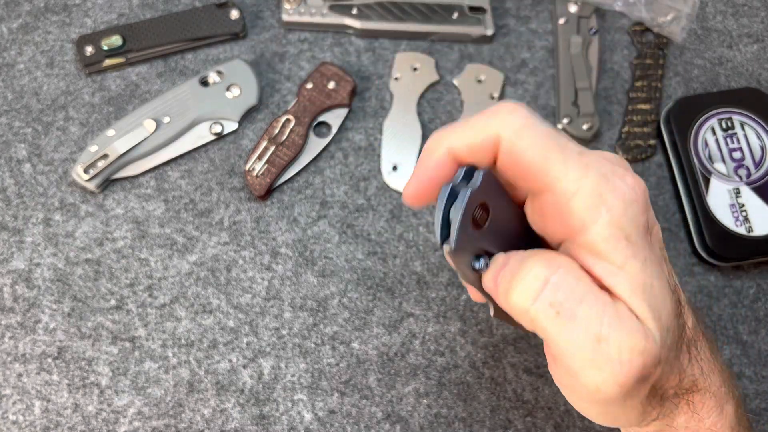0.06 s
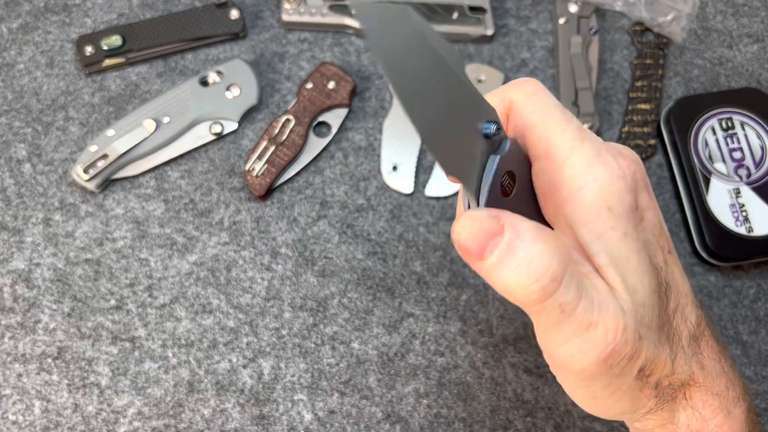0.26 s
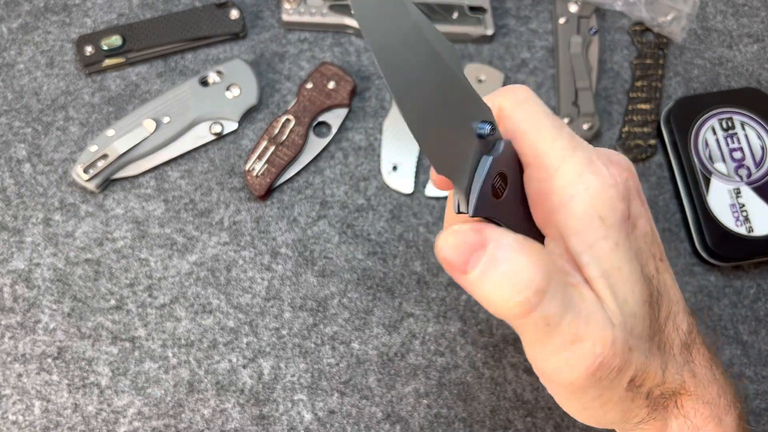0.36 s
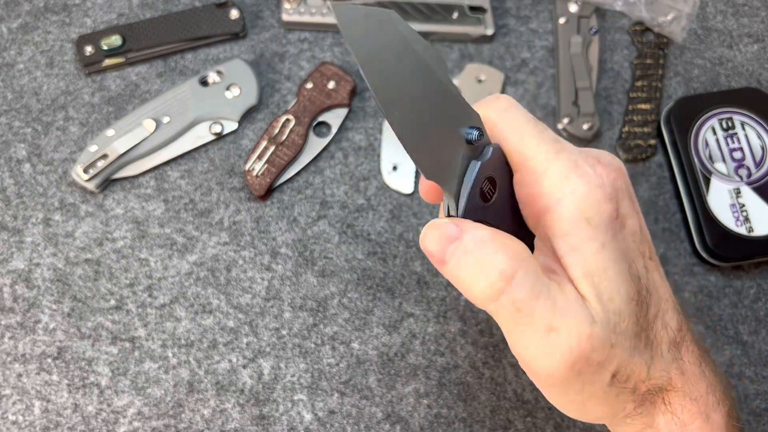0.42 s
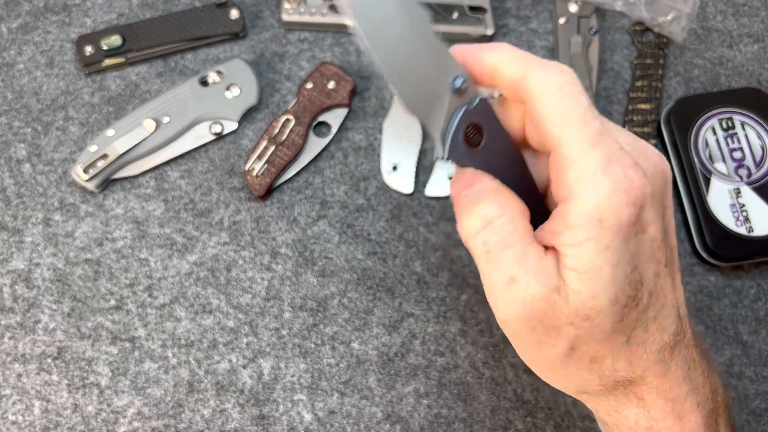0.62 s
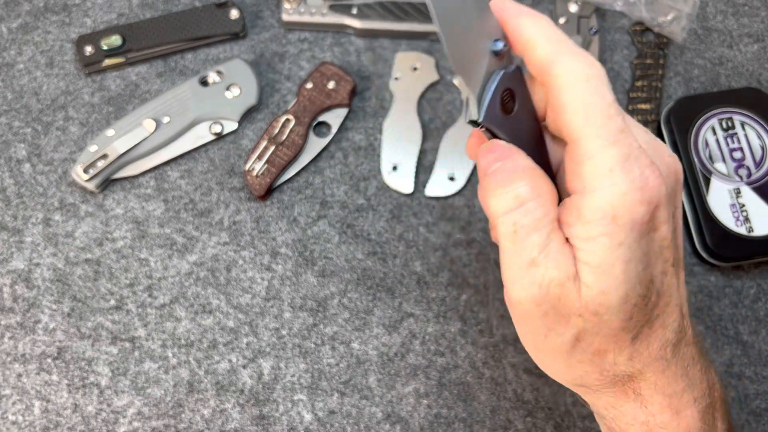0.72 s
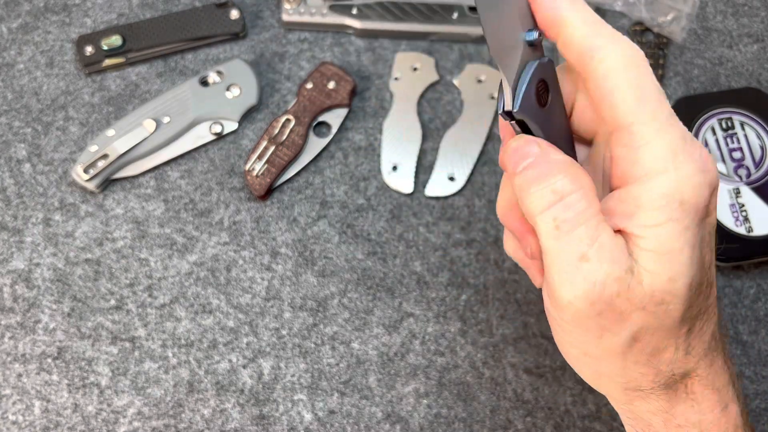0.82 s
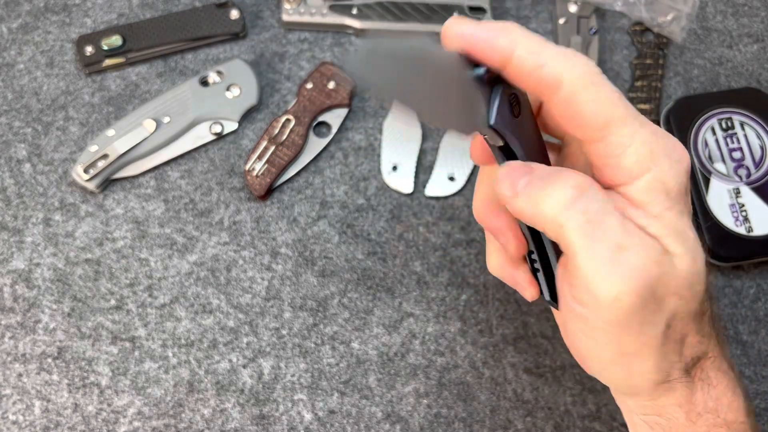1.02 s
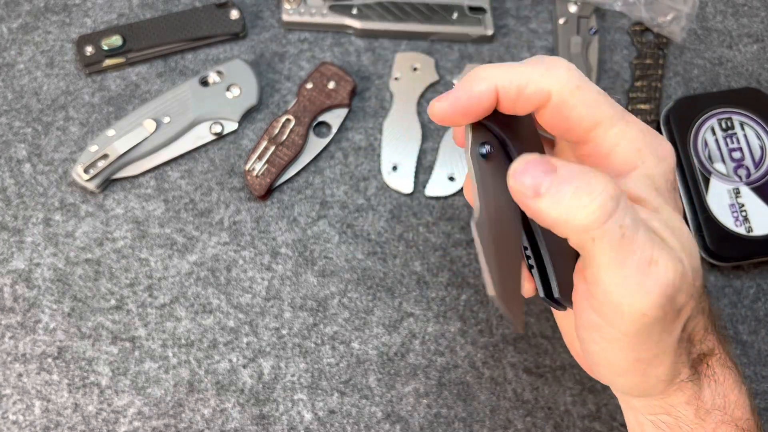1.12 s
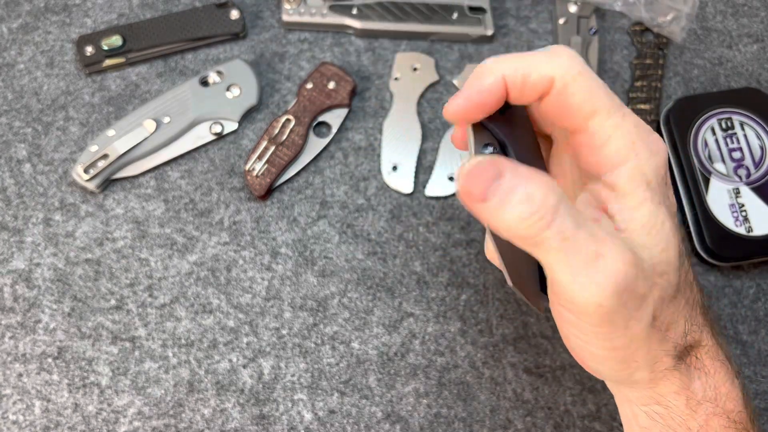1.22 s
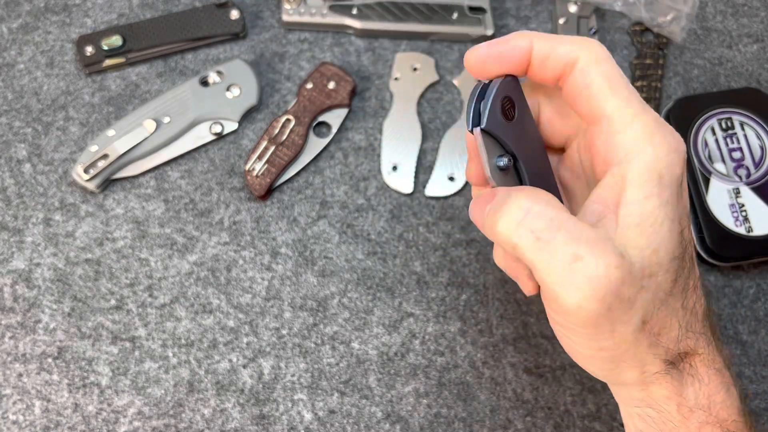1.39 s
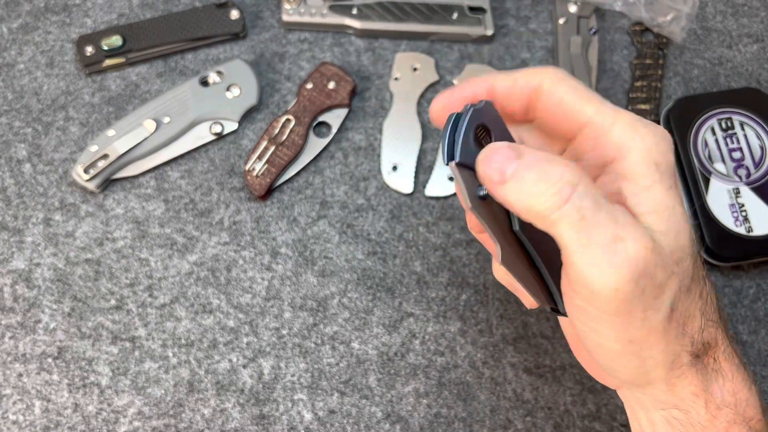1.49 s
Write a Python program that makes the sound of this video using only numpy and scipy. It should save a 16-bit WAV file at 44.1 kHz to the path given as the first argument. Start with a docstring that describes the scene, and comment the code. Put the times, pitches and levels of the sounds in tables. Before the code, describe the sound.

A folding knife handled close to a small microphone in a quiet room with low rumble and faint hiss. Tiny ticks and a brief steely scrape at 0.16 seconds lead into a very loud, clipped, clattering lock-up crack at 0.21, with short room echo. A soft thud follows at 0.6, a sharp lock click at 0.85, small ticks and faint blade rubbing from 0.94, then a crisp closing snap at 1.29.

```python
"""A low rumble and faint hiss in a quiet room, then a folding knife close to a small microphone.
The blade swings out and slams into its lock, overloading the input; something thuds softly;
the lock bar is pushed aside, the blade slides back and snaps shut.
Each blow is a short crack of noise plus the ringing modes of the steel, thrown back by table and walls.
Moving steel is dense random grit, partly ringing at a few pitches."""
import sys
import numpy as np
from scipy import signal
from scipy.fft import rfft, irfft
from scipy.io import wavfile
from scipy.ndimage import uniform_filter1d

SR = 44100
rng = np.random.default_rng(int(sys.argv[2]) if len(sys.argv) > 2 else 0)


def wrap_up_sound(samples):
    """Save the sound to the file named by the first command line argument, as 16-bit audio."""
    columns = np.atleast_2d(samples).T
    # keep every value between -1 and 1, then stretch to whole-number steps
    tamed = np.clip(columns, -1, 1)
    steps = np.round(tamed * 32767).astype(np.int16)
    wavfile.write(sys.argv[1], SR, steps)


def makeup_ratio(level_db):
    """Linear amplitude ratio for a level in decibels (20 dB per factor of ten)."""
    decades = np.asarray(level_db, float) / 20
    return 10 ** decades


N = 68355  # length in samples


def evened(x):
    """Scales a sound to rms 1."""
    return x / np.sqrt(np.mean(x ** 2) + 1e-20)


def read(points, hz):
    """Reads a curve between its points, along a logarithmic frequency axis."""
    f, value = np.transpose(points)
    return np.interp(np.log(hz + 1), np.log(f + 1), value)


def add(mix, start_s, sound):
    """Adds a sound to the mix from its start time, cut off at the end of the mix."""
    part = mix[round(start_s * SR):][:len(sound)]
    part += sound[:len(part)]


def coloured(x, spectrum):
    """Filters a sound by a spectrum curve and scales it to rms 1."""
    gain = makeup_ratio(read(spectrum, np.fft.rfftfreq(len(x), 1 / SR)))
    return evened(irfft(rfft(x) * gain, len(x)))


def resonate(x, hz, width_hz):
    """A resonance of gain 1: shifts its pitch down to zero, smooths, and shifts back up."""
    turn = np.exp(2j * np.pi * hz * np.arange(len(x)) / SR)
    r = np.exp(-np.pi * width_hz / SR)
    return 2 * (turn * signal.lfilter([1 - r], [1, -r], x / turn)).real


def resonate_twice(x, hz, width_hz):
    """Two equal resonances in a row, for steeper sides."""
    return resonate(resonate(x, hz, width_hz), hz, width_hz)


# Colour of the rumble and hiss, before scaling to one overall level: (frequency [Hz], level [dB per Hz])
FLOOR_COLOUR = [(12, -12), (25, -4.5), (45, -3), (81, -10), (132, -12), (204, -18.5), (325, -23.5),
                (461, -29), (672, -36), (850, -38), (2270, -44), (6100, -46.5), (8640, -47), (15400, -49.5)]


def floor():
    """Low rumble and faint hiss: steady random noise whose colour drifts in soft patches."""
    level_db, patchy_db = -47.5, 1.5  # overall rms, rms of the patches
    frames, hz = N // 1024 + 5, np.fft.rfftfreq(4096, 1 / SR)
    real, imaginary, patches = rng.standard_normal((frames, 2049, 3)).T
    patches = uniform_filter1d(patches, size=20, axis=0)  # across frequency
    patches = evened(uniform_filter1d(patches, size=3, axis=1))  # across time
    gain = makeup_ratio(read(FLOOR_COLOUR, hz)[:, None] + patchy_db * patches)
    noise = signal.istft((real + 1j * imaginary) * gain, nperseg=4096, noverlap=3072)[1][:N]
    return makeup_ratio(level_db) * evened(noise)


# Wavering low hum: (frequency [Hz], level [dB], width of each resonance [Hz])
HUM_BANDS = [(28.1, -47, 4.4), (91, -56, 12)]


def hum():
    """Narrow low noise, like distant machinery; the narrow bands make it waver."""
    out = np.zeros(N)
    for hz, db, width_hz in HUM_BANDS:
        noise = resonate_twice(rng.standard_normal(2 * N), hz, width_hz)
        out += makeup_ratio(db) * evened(noise[N:])  # the first half lets the resonance settle
    return out


# Small ticks of detent and fingers:
# (time [s], level [dB], centre [Hz], width of each resonance [Hz], fall by 60 dB [s])
SMALL_TICKS = [(.1613, -32.5, 3300, 3000, .012), (.1800, -24, 1300, 1500, .008),
               (.9365, -43, 1450, 2440, .025), (.937, -54, 770, 245, 0.07), (.9385, -44.5, 5960, 1500, .02),
               (.9585, -33, 7150, 5870, .01), (.9585, -38.5, 1590, 1990, .012),
               (.12, -57, 3100, 502, 0.033)]


def ticks():
    """Tiny dying bursts of noise, each around one pitch."""
    out, t = np.zeros(N), np.arange(2048) / SR
    for start_s, db, hz, width_hz, t60 in SMALL_TICKS:
        burst = evened(resonate_twice(rng.standard_normal(len(t)), hz, width_hz))
        soft_start = np.minimum(t / 0.0012, 1)
        add(out, start_s, makeup_ratio(db - 60 * t / t60) * soft_start * burst)
    return out


# How long each band lingers in the room: (frequency [Hz], fall by 60 dB [s])
ROOM_DECAY = [(250, 0.062), (700, 0.43), (1800, 0.26), (4600, .21), (9000, .19), (15000, .16)]
# First reflections off table and walls: (delay [s], level [dB])
EARLY_ECHOES = [(.0012, -13.5), (.0046, -18.5), (.0083, -18.5)]


def room(x):
    """A few early echoes, then sparse taps whose bands die at their own speed."""
    tail_db = -14
    taps = np.zeros(SR // 2)
    slots = np.arange(200, SR // 2 - 12, 12)
    taps[slots + rng.integers(0, 12, len(slots))] = rng.choice([-1., 1.], len(slots))
    hz, t, z = signal.stft(taps, SR, nperseg=256)
    fade = makeup_ratio(-60 * t / read(ROOM_DECAY, hz)[:, None])
    tail = signal.istft(z * fade, SR, nperseg=256)[1]
    response = makeup_ratio(tail_db) * tail / np.linalg.norm(tail)
    for k, (delay_s, db) in enumerate(EARLY_ECHOES):
        add(response, delay_s, (-1) ** k * makeup_ratio([db]))  # signs alternate
    return signal.fftconvolve(x, response)[:N]


def rub(path, spectrum, lines, sing_db):
    """Dense grit under moving steel, partly ringing it; sing_db sets the ringing against the grit."""
    grit_per_s, grit_db = 12000, 1.5  # average count of grains, average lift of a grain
    t, (time_s, db) = np.arange(N) / SR, np.transpose(path)
    hits = rng.random(N) < grit_per_s / SR
    grit = makeup_ratio(grit_db * rng.exponential(1, N)) * hits * rng.choice([-1, 1], N)
    sing = sum(makeup_ratio(g) / np.sqrt(width_hz) * resonate(grit, hz, width_hz) for hz, width_hz, g in lines)
    sound = evened(coloured(grit, spectrum) + makeup_ratio(sing_db) * evened(sing))
    return sound * makeup_ratio(np.interp(t, time_s, db, left=-140, right=-140))


# Loudness of the blade rubbing round its pivot on the way out: (time [s], level [dB])
SWING_OUT_LEVEL = [(.161, -66.5), (.167, -47.5), (.172, -40.5), (.185, -32.5), (.196, -39), (.201, -42.5),
                   (.209, -40.5)]
# Colour of the rub, before scaling: (frequency [Hz], level [dB per Hz])
RUB_COLOUR = [(880, -49), (1500, -17.5), (3120, -7.5), (4300, -11), (7870, -3), (8430, -3), (9110, -0.5),
              (10200, -18.5), (11500, -7), (15400, -15.5)]
# Steel singing under the rub, before scaling: (frequency [Hz], width [Hz], level [dB])
STEEL_LINES = [(7640, 250, -4), (8340, 110, -4), (9235, 230, -6), (11400, 200, -8.5), (12100, 250, 1.5)]


def swing_out():
    """The opening blade rubs round its pivot, and the grit makes the steel sing."""
    return rub(SWING_OUT_LEVEL, RUB_COLOUR, STEEL_LINES, sing_db=-5)


def click(spectrum):
    """A click of the given colour and energy 1 that starts at once (minimum phase)."""
    log_gain = np.log(makeup_ratio(read(spectrum, abs(np.fft.fftfreq(4096, 1 / SR)))))
    pulse = np.fft.ifft(np.exp(np.conj(signal.hilbert(log_gain)))).real[:2048]
    return pulse / np.linalg.norm(pulse)


def crack_noise(t, colour, tilt_db, t60):
    """A dying burst of noise, its spectrum evened out and then coloured."""
    fade = makeup_ratio(-60 * t / t60)
    burst = rfft(rng.standard_normal(len(t)) * fade)
    burst = irfft(burst / np.sqrt(uniform_filter1d(abs(burst) ** 2, size=90)))
    burst *= np.minimum(t / 0.00082, 1) * (t < t60 * 2)
    tilted = [(hz, db + tilt_db * np.log2(hz / 7000)) for hz, db in colour]
    snap = signal.fftconvolve(burst, click(tilted))[:len(t)]
    return snap * np.linalg.norm(fade) / np.linalg.norm(snap)


def steel_ring(t, modes, tilt_db, damping):
    """Dying sine modes of the steel, struck a little differently each time; the hand shortens them."""
    hz, db, t60 = np.transpose(modes)[:, :, None]
    luck = rng.random((len(modes), 2))
    level_db = db + tilt_db * np.log2(hz / 7000) + 1.8 * (luck[:, :1] - .5)
    fade = makeup_ratio(level_db - 60 * t / (t60 * damping))
    ring = (fade * np.sin(2 * np.pi * (hz * t + luck[:, 1:]))).sum(0)
    return ring / np.linalg.norm(makeup_ratio(db))


def blows(rows, modes, colour, crack_t60, ring_db, damping):
    """Each blow is a crack plus the ringing steel, both tilted in colour by the blow's brightness."""
    out, t = np.zeros(N), np.arange(8192) / SR
    rise = np.minimum(t / 0.00082, 1)
    for start_s, strength_db, tilt_db in rows:
        snap = crack_noise(t, colour, tilt_db, crack_t60)
        ring = rise * steel_ring(t, modes, tilt_db, damping)
        add(out, start_s, makeup_ratio(strength_db) * (snap + makeup_ratio(ring_db) * ring))
    return out


# Blows of the blade into its lock: (time [s], level [dB], brightness [dB per octave])
LOCK_HITS = [(0.2095, 3.5, 5), (0.2137, 4.5, -1), (.2212, 3, -1), (0.2259, -4.5, -3.5), (0.2304, -9.5, -6),
             (.2425, -19.5, -5)]
# Modes of the open knife before the hand damps them:
# (frequency [Hz], relative level [dB], fall by 60 dB [s])
OPEN_MODES = [(2272, -18.5, 0.14), (4255, -15.5, 0.14), (5249, -16, 0.15), (5346, -10.5, 0.14),
              (6030, -4, 0.19), (7381, -15.5, 0.14), (7154, -19.5, 0.15), (7892, 2, 0.037),
              (8448, 2, 0.064), (9735, -13.5, 0.074), (10160, -11, 0.069), (11463, -12.5, 0.08),
              (14840, -20.5, 0.13), (14075, 3, 0.055)]
# Colour of the crack at brightness 0, before scaling: (frequency [Hz], level [dB per Hz])
LOCK_COLOUR = [(100, -70.5), (500, -50), (1000, -31.5), (2300, -10.5), (3500, -11.5), (4500, -9),
               (5700, 4.5), (8000, -2), (12000, -6.5), (15400, -15)]


def lock():
    """The blade slams into its lock: a cluster of cracks, each ringing the open knife."""
    return blows(LOCK_HITS, OPEN_MODES, LOCK_COLOUR, crack_t60=0.028, ring_db=-4.5, damping=.3)


# The open blade rings on faintly: (frequency [Hz], level [dB], fall by 60 dB [s])
LONG_MODES = [(6140, -69, 1.6), (6162, -72, 1.4), (5480, -73, 1.2), (7250, -74, 1.2)]
# The handle knocks in the palm: (frequency [Hz], level [dB], fall by 60 dB [s])
HANDLE_MODES = [(286, -36, .06), (604, -39.5, .04), (712, -37.5, .04), (60, -42.5, .12)]


def ring_on():
    """Faint long modes of the blade and the low knock of the handle, from the second lock blow."""
    out, t = np.zeros(N), np.arange(SR) / SR
    for hz, db, t60 in LONG_MODES + HANDLE_MODES:
        add(out, LOCK_HITS[1][0], makeup_ratio(db - 60 * t / t60) * np.sin(2 * np.pi * hz * t))
    return out


# Soft thuds: (time [s], level [dB])
SOFT_THUDS = [(0.596, -33.5), (.617, -39)]
# Colour of a thud, before scaling: (frequency [Hz], level [dB per Hz])
THUD_COLOUR = [(30, -37), (60, -3), (100, -2.5), (200, -15), (350, -11), (700, -24), (1200, -35.5),
               (2000, -44), (3000, -39), (4200, -52), (6000, -89.5)]
# The table under the thud, one row: (frequency [Hz], level [dB], fall by 60 dB [s])
TABLE_BOOM = (90.8, -44.5, 0.23)


def thud():
    """Dull low noise with a soft start, and a dying sine for the boom of the table at the last thud."""
    out, t = np.zeros(N), np.arange(8192) / SR
    rise_s, thud_t60 = 0.0032, 0.13  # start and fall by 60 dB, in seconds
    for start_s, db in SOFT_THUDS:
        shape = np.minimum(t / rise_s, 1) * makeup_ratio(db - 60 * t / thud_t60)
        add(out, start_s, shape * coloured(rng.standard_normal(len(t)), THUD_COLOUR))
    hz, boom_db, boom_t60 = TABLE_BOOM
    add(out, SOFT_THUDS[-1][0], makeup_ratio(boom_db - 60 * t / boom_t60) * np.sin(2 * np.pi * hz * t))
    return out


# Loudness of the sliding lock bar: (time [s], level [dB])
BAR_SLIDE_LEVEL = [(.826, -91), (.829, -45), (.832, -43.5), (.836, -66), (.843, -45.5), (.847, -60)]
# The bar singing as it slides, before scaling: (frequency [Hz], width [Hz], level [dB])
BAR_SINGING = [(4376, 300, -8.5), (8480, 110, -4.5)]


def bar_slide():
    """The lock bar scrapes aside, with more singing than grit."""
    return rub(BAR_SLIDE_LEVEL, RUB_COLOUR, BAR_SINGING, sing_db=6.5)


# Blows of the lock bar: (time [s], level [dB], brightness [dB per octave])
BAR_HITS = [(.8470, -15, 0.085), (.8548, -31, -1.6)]
# Modes of the lock bar before the hand damps them:
# (frequency [Hz], relative level [dB], fall by 60 dB [s])
BAR_MODES = [(2250, -16, .08), (4280, -1, .035), (4460, -7, .05), (4900, -9, .04), (5250, -6, .04),
             (5965, -9, .058), (6400, -9, .04), (7100, -14, .07), (7680, -13, .08), (8484, -4, .065),
             (10150, -11, .038), (14380, -11, .08)]
# Colour of the crack at brightness 0, before scaling: (frequency [Hz], level [dB per Hz])
BAR_COLOUR = [(700, -84.5), (1100, -18), (1640, -7), (3300, -10.5), (4400, 1.5), (5300, -3.5), (6500, 4),
              (9300, -9.5), (14400, -15), (15400, -24)]


def bar():
    """The lock bar knocks as it is pushed aside: very short cracks and its ringing steel."""
    return blows(BAR_HITS, BAR_MODES, BAR_COLOUR, crack_t60=0.0066, ring_db=-6, damping=0.55)


# Loudness of the blade rubbing on the way back: (time [s], level [dB])
SWING_IN_LEVEL = [(0.965, -51), (0.969, -62), (0.989, -53.5), (1.059, -56.5), (1.097, -65.5), (1.12, -93)]
# Colour of this rub, before scaling: (frequency [Hz], level [dB per Hz])
SWING_IN_COLOUR = [(1500, -30), (2100, -3.5), (3500, -12.5), (5500, -3.5), (8100, 3.5), (10500, -9),
                   (12500, -13), (15400, -5)]


def swing_in():
    """The closing blade rubs round its pivot, with a colour of its own."""
    return rub(SWING_IN_LEVEL, SWING_IN_COLOUR, STEEL_LINES, sing_db=-5)


# Loudness of the finger slip: (time [s], level [dB])
FINGER_SLIP_LEVEL = [(1.17, -82), (1.19, -63), (1.21, -85)]


def finger_slip():
    """A finger slips: a very faint rub, made of the same grit as the opening swing."""
    return rub(FINGER_SLIP_LEVEL, RUB_COLOUR, STEEL_LINES, sing_db=-5)


# Blows of the closing blade: (time [s], level [dB], brightness [dB per octave])
SHUT_HITS = [(1.2903, -10, 0.0088), (1.2985, -24, 0.011)]
# Modes of the shut knife before the hand damps them:
# (frequency [Hz], relative level [dB], fall by 60 dB [s])
SHUT_MODES = [(2110, -5, .09), (2229, -13, .12), (4037, -15, .08), (5125, -3, .09), (5265, -8, .1),
              (5954, -11, .08), (6433, -16, .1), (7500, -10, .09), (8290, -8, .09), (8376, 0, .075),
              (8699, -4, .045), (9738, -17, .06), (11350, -15, .08), (12400, -16, .05), (13530, -15, .05)]
# Colour of the crack at brightness 0, before scaling: (frequency [Hz], level [dB per Hz])
SHUT_COLOUR = [(100, -45), (300, -9.5), (1000, -14), (1700, -11.5), (2100, -20), (3500, -6), (5200, -1.5),
               (6800, -2), (8500, -1), (12000, -9.5), (15400, -20)]


def shut():
    """The blade snaps shut: cracks with the ringing steel louder against them than at the lock."""
    return blows(SHUT_HITS, SHUT_MODES, SHUT_COLOUR, crack_t60=.028, ring_db=2, damping=0.4)


def scene():
    """Knife and hand in the room, over the rumble and hum."""
    opening = ticks() + swing_out() + lock() + ring_on() + thud()
    closing = bar_slide() + bar() + swing_in() + finger_slip() + shut()
    near = opening + closing
    return (near + room(near) + floor() + hum())[None]


def top_cut(x):
    """Nothing passes above the cut-off."""
    return signal.sosfilt(signal.butter(12, 15580, fs=SR, output="sos"), x)


def record(dry):
    """The overloaded input cuts off every peak hard at a fixed height."""
    clipped = np.clip(dry, -0.83, 0.83)
    return top_cut(clipped)


dry = scene()
out = record(dry)
wrap_up_sound(out)
```